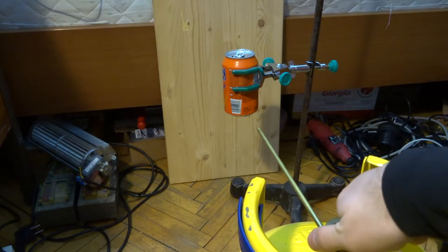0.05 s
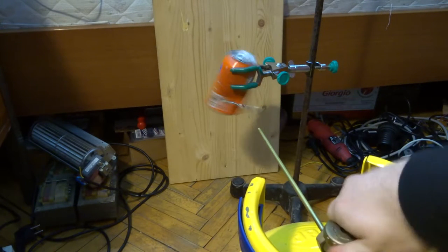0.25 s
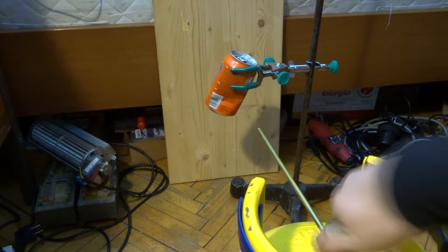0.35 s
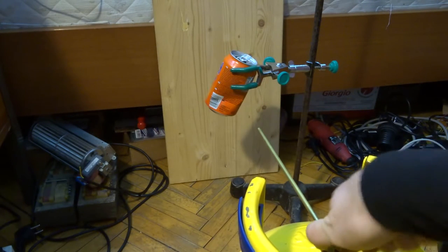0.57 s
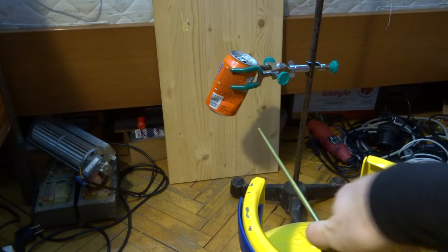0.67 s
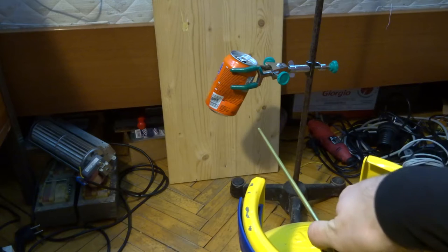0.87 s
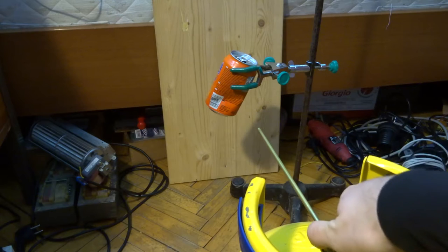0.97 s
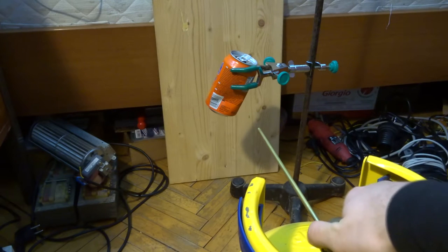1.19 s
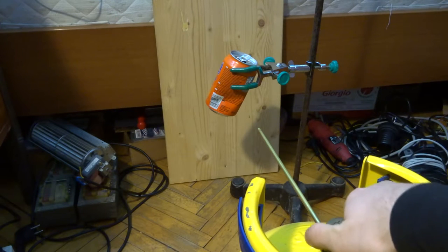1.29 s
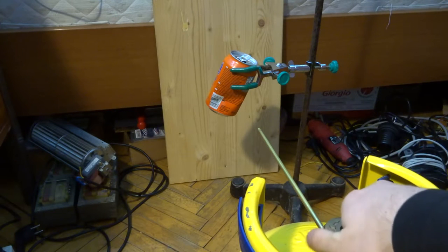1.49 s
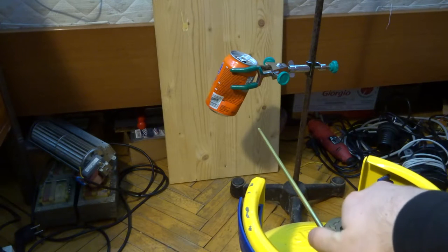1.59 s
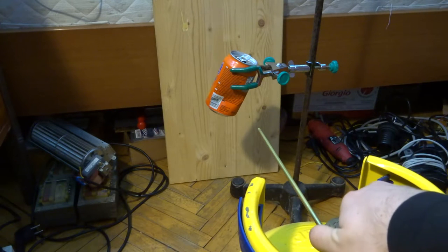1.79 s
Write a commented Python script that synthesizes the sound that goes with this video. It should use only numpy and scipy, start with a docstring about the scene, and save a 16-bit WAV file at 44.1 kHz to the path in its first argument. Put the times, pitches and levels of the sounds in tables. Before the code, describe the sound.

A gas-powered shot goes off at about 0.2 seconds with a short spit, a pop and a hollow rush from the tube. At 0.5 seconds a hard thump briefly rings a metal can. Leaking gas then makes a very high, fluttering squeal with hiss and sputters, dying away by 1.4 seconds. Near 1.8 seconds a hand softly bumps and rubs the housing in the quiet small room.

```python
"""A short spit, a rush of gas and a hard metallic thump, then a high, sputtering squeal that dies away.
This is a gas-powered shot at a clamped drink can in a small room. The valve opens, the blast excites
the resonances of the tube, and the impact rings the metal. Gas then leaks on through the valve, singing
on a few high tones until the pressure is gone. Last, a hand shifts softly on the housing."""
import sys
import numpy as np
from scipy import signal
from scipy.fft import rfft, irfft
from scipy.io import wavfile

SR = 44100
rng = np.random.default_rng(int(sys.argv[2]) if len(sys.argv) > 2 else 0)


def dump_mix(stems):
    """Bounce the given channels to the path in sys.argv[1] as a 16-bit WAV at rate SR."""
    frames = np.atleast_2d(stems).T  # one column per channel
    limited = np.clip(frames, -1, 1)  # hard clip at full scale
    pcm = np.round(limited * 32767).astype(np.int16)
    wavfile.write(sys.argv[1], SR, pcm)


N = 81585
T = np.arange(N) / SR


def amp(db):
    """Amplitude ratio: tenfold for every 20 dB."""
    return 10 ** (np.asarray(db) / 20)


def unit(x):
    """Normalisation to an rms of 1."""
    return x / np.sqrt(np.mean(abs(x) ** 2) + 1e-20)


def read(points, hz):
    """Interpolation on a logarithmic frequency axis."""
    f, value = np.transpose(points)
    return np.interp(np.log(hz + 1), np.log(f + 1), value)


def level(points):
    """Amplitude envelope through (time_s, level_db) points, fading to silence outside them."""
    s, db = np.transpose(points)
    gate = np.interp(T, [s[0] - .003, s[0], s[-1], s[-1] + .04], [0, 1, 1, 0])
    return amp(np.interp(T, s, db)) * gate


def noise(colour):
    """Spectral shaping of white noise by (frequency_hz, gain_db) points, at unit rms."""
    gain = amp(read(colour, np.fft.rfftfreq(N, 1 / SR)))
    return unit(irfft(rfft(rng.standard_normal(N)) * gain, N))


def drift(width_hz):
    """Random modulation: low-passed complex Gaussian noise."""
    hz = np.fft.fftfreq(N, 1 / SR)
    spectrum = rng.standard_normal(N) + 1j * rng.standard_normal(N)
    return unit(np.fft.ifft(spectrum / (1 + (hz / width_hz) ** 2)))


def resonance(hz, width_hz, steadiness=.5):
    """Narrow-band noise of a randomly driven mode; a steadiness of 1 holds its amplitude constant."""
    motion = drift(width_hz)
    envelope = motion / (abs(motion) + 1e-9) ** steadiness
    return unit((envelope * np.exp(2j * np.pi * hz * T)).real)


def struck(start_s, t60_s, attack_s=0.00045):
    """Damping after an impulse: a quick rise and an exponential decay of 60 dB in t60_s."""
    age = np.maximum(T - start_s, 0)
    return np.minimum(age / attack_s, 1) * 1000. ** (-age / t60_s)


# Room noise spectrum: frequency_hz, gain_db
ROOM_NOISE = [(20, -36), (45, -12), (280, -6.5), (560, -17.5), (1100, -18), (2400, -29), (4300, -40.5),
              (15500, -43.5)]
# Hum tones: pitch_hz, level_db
HUM_TONES = [(100, -58), (268, -59.5)]
def background():
    """Noise floor: broadband room noise, a wavering hum and the thin whistle of the seeping valve."""
    hum = sum(amp(db) * resonance(hz, 2.6) for hz, db in HUM_TONES)
    return amp(-51.5) * noise(ROOM_NOISE) + hum + amp(-66) * resonance(hz=11850, width_hz=350)


# Soft knocks: start_s, level_db
HAND_BUMPS = [(1.727, -38), (1.841, -37.5)]
# Their spectrum: frequency_hz, gain_db
BUMP_SPECTRUM = [(60, -14), (400, 0), (4000, -40)]
def hand_bumps(t60_s=0.039):
    """Heavily damped impacts: the hand shifts on the housing."""
    return noise(BUMP_SPECTRUM) * sum(amp(db) * struck(s, t60_s) for s, db in HAND_BUMPS)


# Friction envelope: time_s, level_db
SCRAPE_LEVEL = [(1.74, -63), (1.79, -50), (1.84, -51)]
# Rubbed resonances: pitch_hz, gain_db
SCRAPE_MODES = [(1290, 0), (2120, -1)]
def hand_scrape(width_hz=170, sag_per_s=1.2):
    """Sliding friction on the housing excites two broad resonances that sag as the hand slows."""
    age = np.maximum(T - SCRAPE_LEVEL[0][0], 0)
    phase_per_hz = 2 * np.pi * np.cumsum(1 - sag_per_s * age) / SR
    modes = sum(amp(db) * unit((drift(width_hz) * np.exp(1j * hz * phase_per_hz)).real)
                for hz, db in SCRAPE_MODES)
    return level(SCRAPE_LEVEL) * modes


# Brief valve tones: start_s, length_s, pitch_hz, level_db
VALVE_SQUEAKS = [(.658, .07, 3205, -39.5), (.658, .09, 5280, -44), (.66, .22, 3520, -44)]
def valve_squeaks(width_hz=45, fade_db=7):
    """Flow excitation: side tones of the valve catch briefly and fade."""
    return sum(level([(s, db), (s + length, db - fade_db)]) * resonance(hz, width_hz)
               for s, length, hz, db in VALVE_SQUEAKS)


# Hiss envelope: time_s, level_db
LEAK_LEVEL = [(.518, -28), (.63, -48), (.76, -42), (.85, -46.5), (.9, -40.5), (1.14, -37.5), (1.19, -47),
              (1.26, -49.5), (1.37, -86)]
# Spectra of the hiss and the sputters: frequency_hz, gain_db
LEAK_SPECTRUM = [(600, -25.5), (2600, -4), (4000, -7.5), (4900, 0), (6400, 5), (8300, -8), (12300, 4.5),
                 (13500, -32)]
SPUTTER_SPECTRUM = [(500, -34), (3400, -7), (5000, 0), (12000, -3), (14500, -42.5)]
# Bursts of gas: start_s, level_db, tilt_db_per_octave
SPUTTERS = [(.5175, -29.5, 1), (.765, -28.5, -3), (.8848, -22.5, 1), (.8955, -25.5, -2), (.963, -24, -1),
            (1.0166, -24.5, 1), (1.0852, -23.5, -1), (1.1062, -25, 0), (1.129, -27.5, -1)]
def valve_leak(grain_db=3, grain_hz=250, sputter_t60_s=.016):
    """Turbulent jet noise: leaking gas makes a grainy hiss with sharp sputters."""
    out = level(LEAK_LEVEL) * unit(noise(LEAK_SPECTRUM) * amp(grain_db * drift(grain_hz).real))
    for s, db, tilt in SPUTTERS:
        colour = [(hz, base_db + tilt * np.log2(hz)) for hz, base_db in SPUTTER_SPECTRUM]
        out += amp(db) * struck(s, sputter_t60_s) * noise(colour)
    return out


# Envelopes of five high valve tones and a low moan: time_s, level_db
SQUEAL_A = [(.53, -40), (.572, -29), (.592, -34), (.625, -24), (.748, -26), (.756, -37), (.795, -28),
            (.84, -37.5), (.878, -22.5), (.94, -26.5), (.96, -36), (1.0, -30), (1.085, -30.5), (1.11, -44),
            (1.28, -56), (1.52, -75)]
SQUEAL_B = [(.519, -33), (.63, -37), (.667, -24), (.765, -39), (.79, -27), (.85, -31), (.89, -20.5),
            (1.04, -25), (1.08, -42), (1.29, -54)]
SQUEAL_C = [(.519, -42), (.555, -24.5), (.72, -25), (.77, -21.5), (.88, -26.5), (1.01, -20), (1.1, -33.5),
            (1.32, -43), (1.46, -68)]
SQUEAL_D = [(.519, -34), (.77, -25), (.93, -26), (.98, -22), (1, -36), (1.065, -15), (1.135, -20.5),
            (1.165, -42), (1.33, -42), (1.45, -74.5)]
SQUEAL_E = [(.53, -43), (.87, -49), (.885, -39), (.97, -35), (1.0, -42), (1.13, -46), (1.25, -63)]
MOAN = [(.55, -42), (.7, -38), (.77, -50), (1.13, -55), (1.26, -68)]
# Tones of the leaking valve: envelope, settled_pitch_hz, early_offset_hz
VALVE_TONES = [(SQUEAL_A, 5902, 24), (SQUEAL_B, 6243, -27), (SQUEAL_C, 11720, 8), (SQUEAL_D, 12128, -13.5),
               (SQUEAL_E, 9618, 0), (MOAN, 1875, 22)]
def valve_squeal(settle_s=.76, settle_span_s=.04, weak_db=-49, waver_hz=5, flutter_hz=30.06):
    """Self-sustained oscillation of the leaking valve: tones flutter most at first and when weak."""
    early = .5 - .5 * np.tanh((T - settle_s) / settle_span_s)
    out = np.zeros(N)
    for envelope, hz, offset_hz in VALVE_TONES:
        gain = level(envelope)
        weakness = 1 / (1 + (gain / amp(weak_db)) ** 2)
        unsteady = np.maximum(early, weakness)
        fuzz = .22 + .34 * unsteady
        depth = .2 + .4 * unsteady
        pitch_hz = hz + offset_hz * early + waver_hz * drift(9.2).real
        carrier = np.exp(2j * np.pi * np.cumsum(pitch_hz) / SR)
        rate_hz = flutter_hz * (1 + .5 * drift(10).real)
        flutter = 1 + depth * np.sin(2 * np.pi * np.cumsum(rate_hz) / SR)
        modulation = flutter + fuzz * drift(width_hz=95)
        rms = np.sqrt((1 + fuzz ** 2 + depth ** 2 / 2) / 2)
        out += gain * (modulation * carrier).real / rms
    return out


# Whistles of the opening valve: pitch_hz, gain_db
OPENING_TONES = [(3900, -5), (5720, 0.5), (10100, -1)]
def valve_opening(start_s=0.19, peak_s=0.21, end_s=0.2214, low_db=-47, peak_db=-23):
    """Turbulence in the opening valve hisses and drives its resonances for a moment."""
    tones = unit(sum(amp(db) * resonance(hz, width_hz=190) for hz, db in OPENING_TONES))
    hiss = amp(-3) * rng.standard_normal(N)
    swell = level([(start_s, low_db), (peak_s, peak_db), (end_s, peak_db), (end_s + .003, low_db)])
    return swell * (tones + hiss)


# Spectrum of the rushing gas: frequency_hz, gain_db
BLAST_SPECTRUM = [(130, -29), (270, -14), (390, -12), (490, -16), (780, -9), (1050, -15), (3200, -12.5),
                  (4300, -20.5), (11300, -18.5), (15800, -34)]
# Its decay after the hold: frequency_hz, decay_db_per_s
BLAST_DECAY = [(300, 110), (2200, 90), (14000, 280)]
# Tube resonances: pitch_hz, level_db
TUBE_MODES = [(1245, -33), (1810, -29), (2560, -35), (11140, -38)]
# Envelope of the tube's lowest resonance: time_s, level_db
HOOT_LEVEL = [(.27, -33), (.298, -19.5), (.325, -26), (.375, -25), (.43, -42)]
def gas_blast(start_s=.2265, hold_s=0.13, attack_s=0.0017, hoot_hz=888):
    """Air-column resonance: a pop and a rush of gas sound the tube, and the treble dies first."""
    hz, t, spectrum = signal.stft(noise(BLAST_SPECTRUM), SR, nperseg=256)
    loss_db = read(BLAST_DECAY, hz)[:, None] * np.maximum(t - start_s - hold_s, 0)
    rush = amp(-19.5) * signal.istft(spectrum * amp(-loss_db), SR, nperseg=256)[1][:N]
    fading_s = np.maximum(T - start_s - hold_s, 0)
    tube = sum(amp(db - read(BLAST_DECAY, f) * fading_s) * resonance(f, width_hz=30)
               for f, db in TUBE_MODES)
    hoot = level(HOOT_LEVEL) * resonance(hoot_hz, width_hz=6, steadiness=1)
    pop = amp(-21) * struck(start_s, t60_s=0.065) * noise(BLAST_SPECTRUM)
    onset = np.clip((T - start_s) / attack_s, 0, 1)
    return onset * (rush + tube + hoot) + pop


# Blows: start_s, gain_db
IMPACTS = [(.5008, -0.5), (.5155, -13.5)]
# Spectrum of their dull body: frequency_hz, gain_db
IMPACT_SPECTRUM = [(80, -29), (290, -20), (390, -11.5), (800, -7.5), (1400, -11.5), (1900, -24),
                   (3200, -14.5), (5000, -31)]
# Modes of the metal: pitch_hz, level_db
METAL_MODES = [(394, -32), (544, -30), (740, -30), (806, -27), (1317, -19.5), (1354, -21)]
def metal_thump(ring_t60_s=0.43, body_t60_s=0.37, cutoff_hz=4200):
    """Damped free vibration: two dull blows set the loosely clamped metal ringing unevenly."""
    ring = sum(amp(db) * resonance(hz, width_hz=11, steadiness=0.98) for hz, db in METAL_MODES)
    body = amp(-17.8) * noise(IMPACT_SPECTRUM)
    blows = sum(amp(db) * (struck(s, ring_t60_s) * ring + struck(s, body_t60_s) * body)
                for s, db in IMPACTS)
    return signal.sosfilt(signal.butter(4, cutoff_hz, fs=SR, output="sos"), blows)


# Reverberation time: frequency_hz, t60_s
ROOM_DECAY = [(4000, 0.49), (14000, 0.19)]
# Stereo width of the tail: frequency_hz, side_to_mid_ratio
ROOM_WIDTH = [(200, .15), (2000, 0.43)]
def place(x, pan_db, wet_db):
    """Reverberation: direct sound plus the small room's diffuse tail, mostly alike at both ears."""
    reflections = rng.standard_normal((2, SR // 2)) * (np.arange(SR // 2) > .004 * SR)
    hz, t, spectrum = signal.stft(reflections, SR, nperseg=256)
    spectrum[1] *= read(ROOM_WIDTH, hz)[:, None]
    decay = 1000. ** (-t / read(ROOM_DECAY, hz)[:, None])
    tail = signal.istft(spectrum * decay, SR, nperseg=256)[1]
    tail /= np.linalg.norm(tail[0])
    mid, side = amp(wet_db) * signal.fftconvolve(x[None], tail, axes=1)[:, :N]
    return np.array([(x + mid + side) * amp(pan_db / 2), (x + mid - side) * amp(-pan_db / 2)])


def scene():
    """Superposition of all sources in the room."""
    return (place(background() + hand_bumps() + hand_scrape(), pan_db=0, wet_db=-13)
            + place(valve_opening() + gas_blast(), pan_db=-0.6, wet_db=-9.5)
            + place(metal_thump(), pan_db=-.4, wet_db=-10)
            + place(valve_squeal(), pan_db=-1.7, wet_db=-10.5)
            + place(valve_leak() + valve_squeaks(), pan_db=-1, wet_db=-8))


def record(dry):
    """Band limiting: a steep low-pass filter removes the highest treble."""
    lowpass = signal.firwin(511, cutoff=15900, window=("kaiser", 9), fs=SR)
    return signal.oaconvolve(dry, lowpass[None], "same")


dry = scene()
out = record(dry)
dump_mix(out)
```